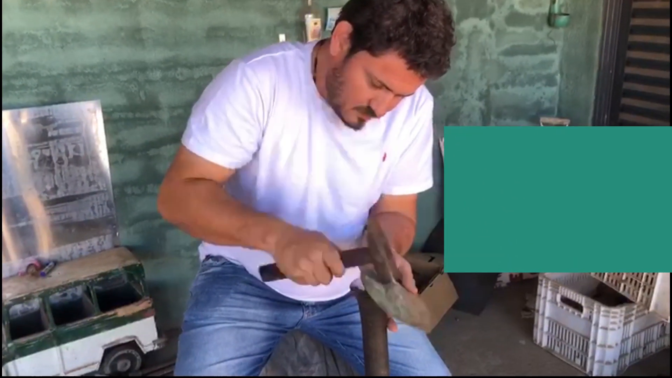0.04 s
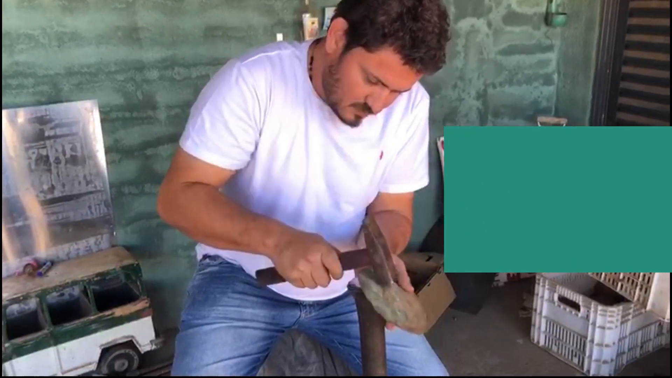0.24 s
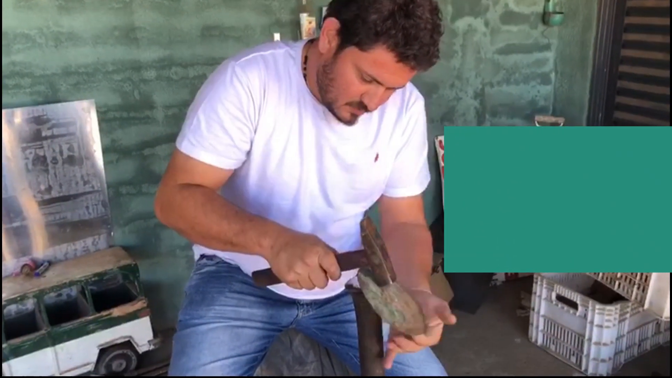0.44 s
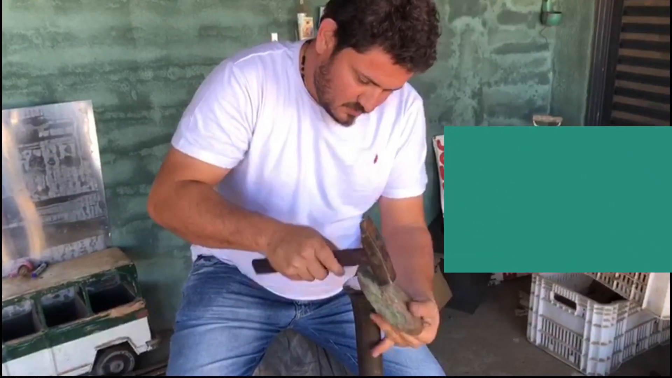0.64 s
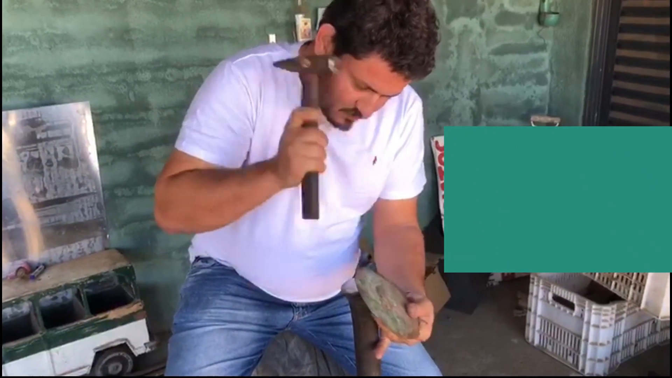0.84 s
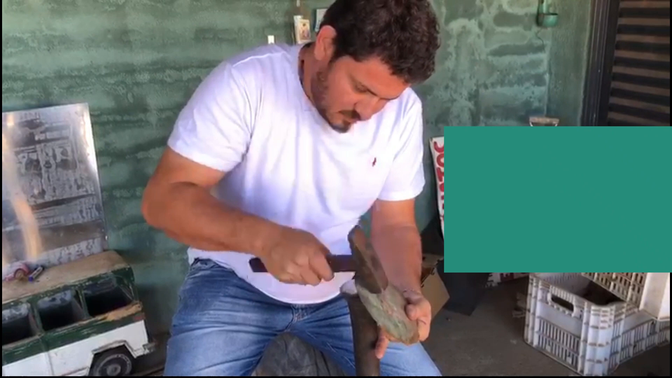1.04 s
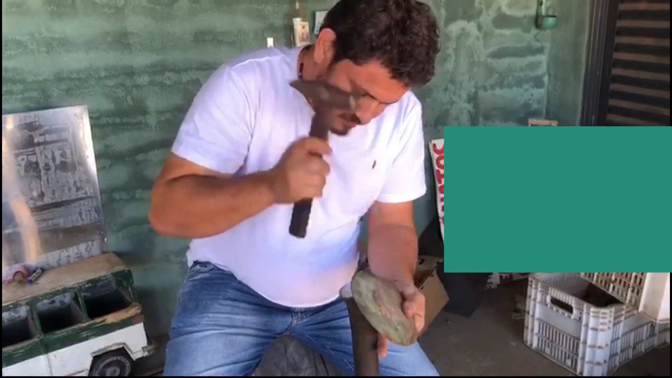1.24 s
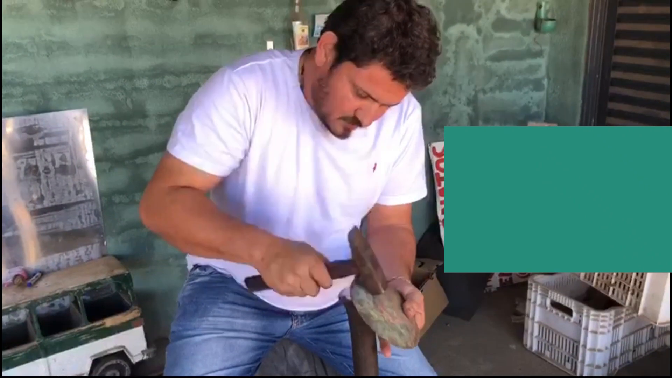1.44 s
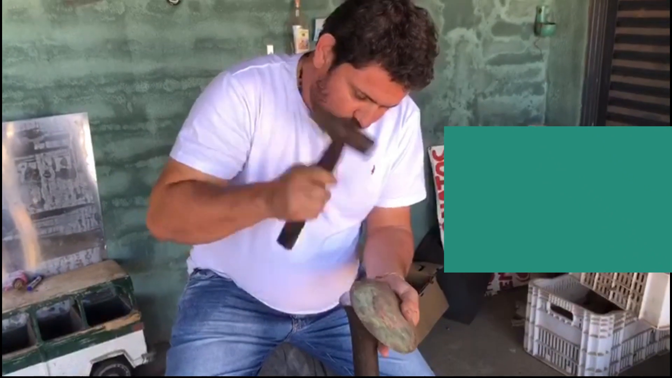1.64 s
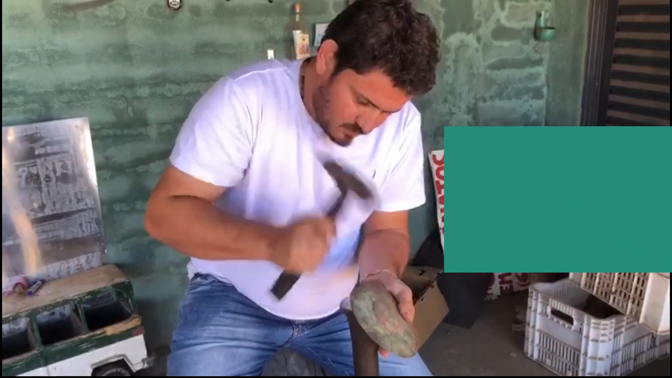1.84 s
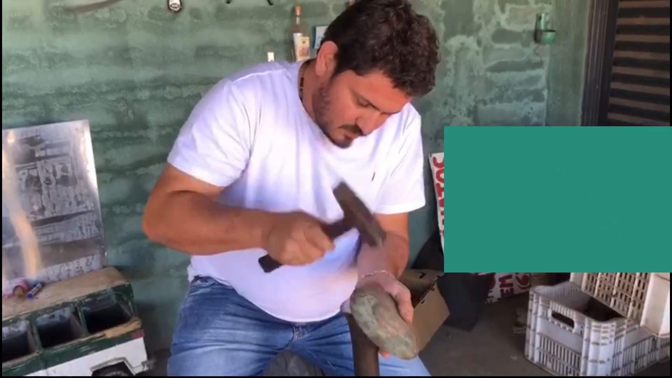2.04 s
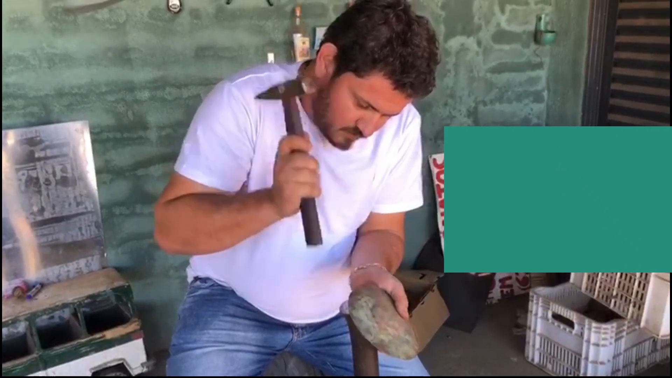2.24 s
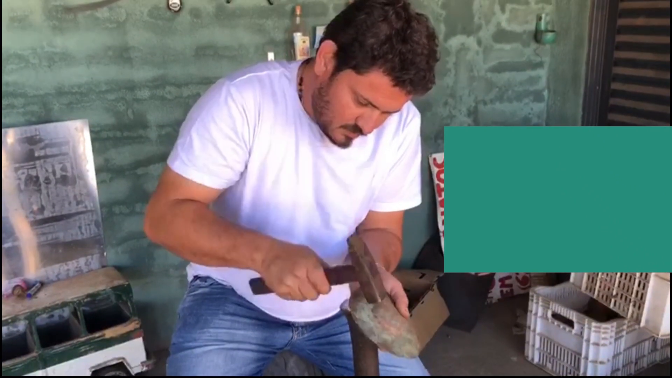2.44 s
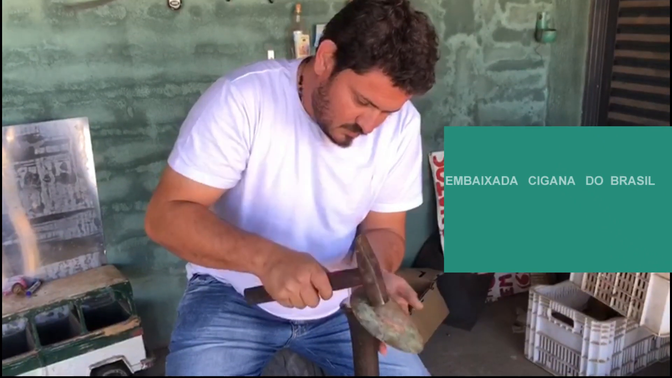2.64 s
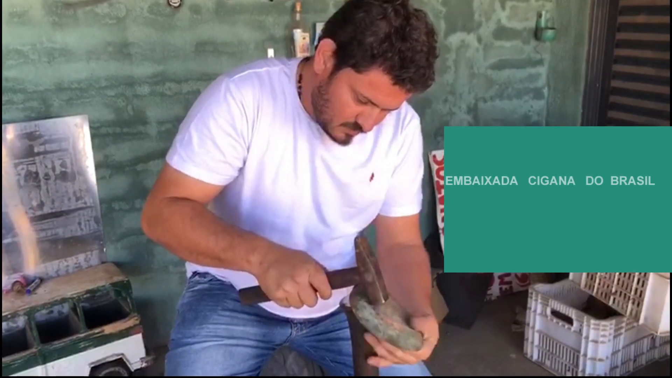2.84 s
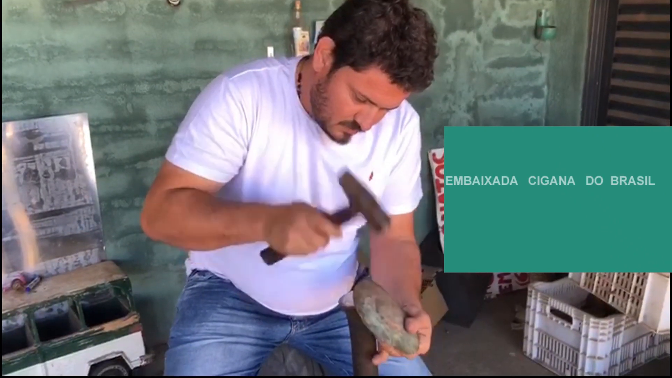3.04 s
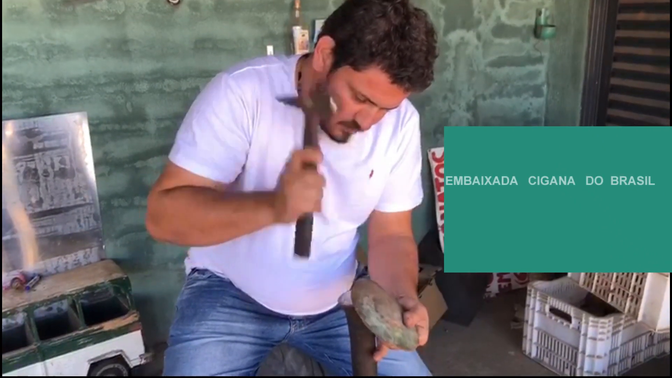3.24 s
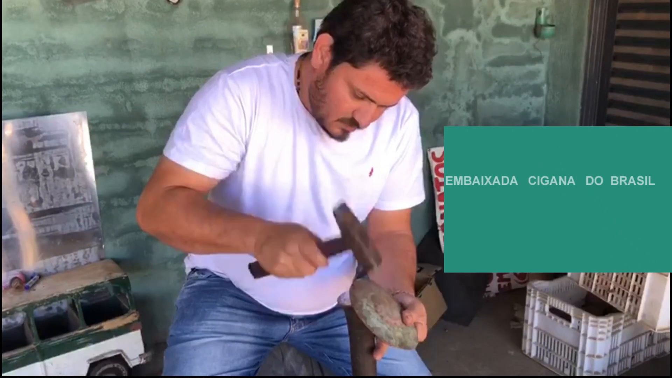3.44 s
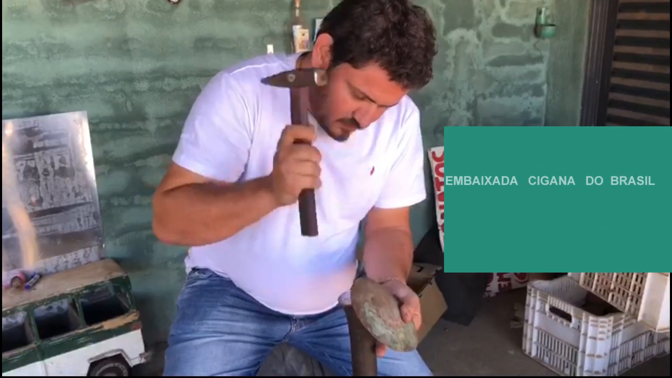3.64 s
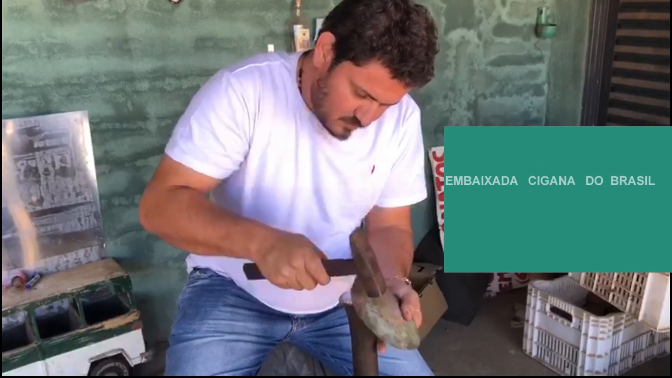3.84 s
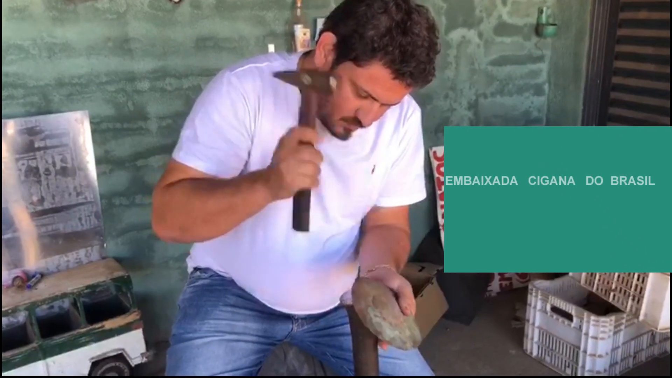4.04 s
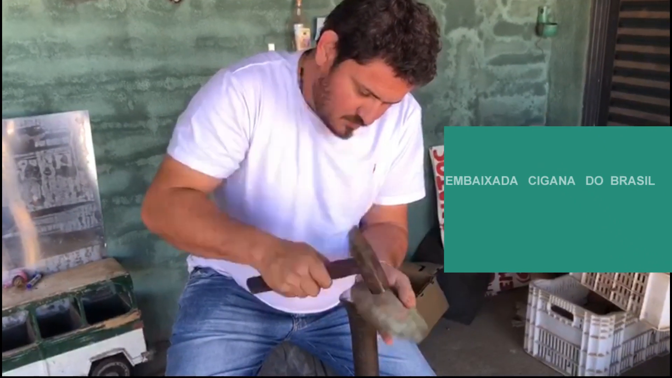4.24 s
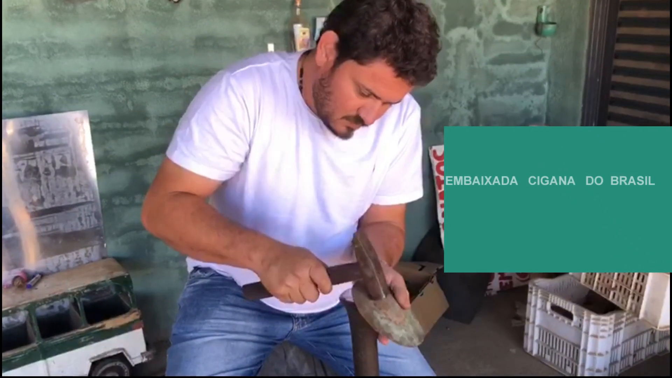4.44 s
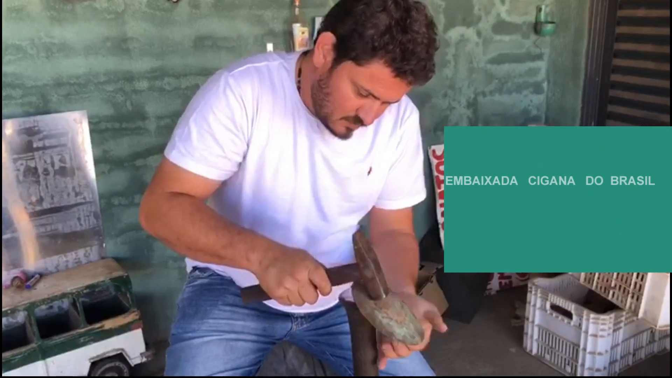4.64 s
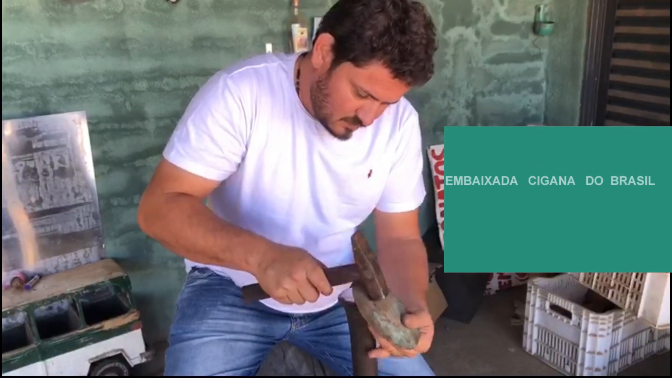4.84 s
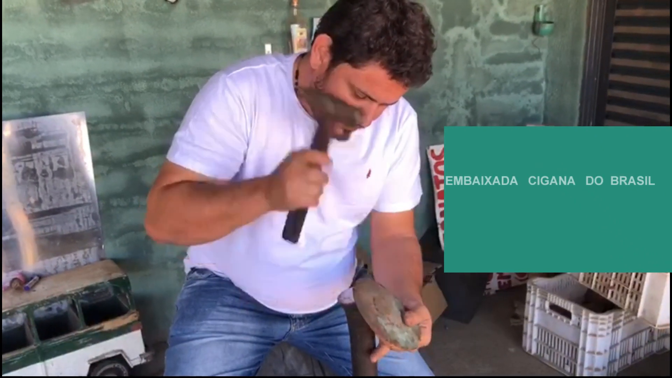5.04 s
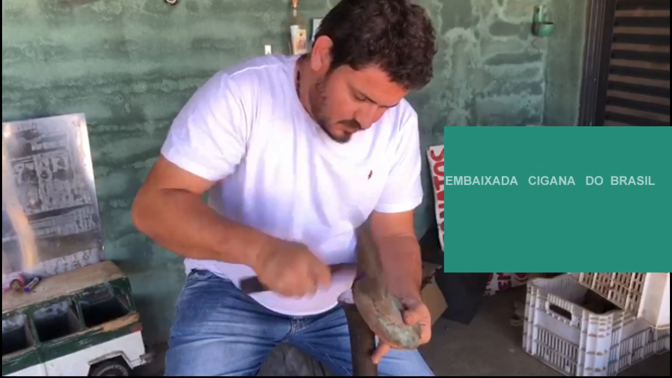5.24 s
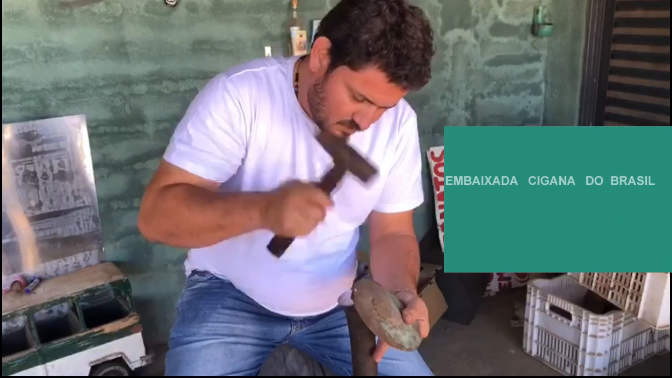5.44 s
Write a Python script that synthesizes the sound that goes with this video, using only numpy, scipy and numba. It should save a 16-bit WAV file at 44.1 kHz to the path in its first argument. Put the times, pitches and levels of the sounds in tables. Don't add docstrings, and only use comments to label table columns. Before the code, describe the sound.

The ring of an earlier blow is still fading as the stretch opens, then nine full hammer strokes on copper over steel follow, with pauses and a few tiny clicking rebounds. The blows sound piercing, short and slightly flattened by a phone microphone at two metres. The bare workshop answers with a brief bright echo, while quiet street rumble, rubbing metal and a faint bird-like whistle fill the gaps.

```python
import sys
import numpy as np
from scipy import signal
from scipy.fft import rfft, irfft
from scipy.io import wavfile
from scipy.ndimage import uniform_filter1d, minimum_filter1d
from numba import njit

SR = 44100
rng = np.random.default_rng(int(sys.argv[2]) if len(sys.argv) > 2 else 0)


def dump_mix(stems):
    frames = np.atleast_2d(stems).T
    limited = np.clip(frames, -1, 1)
    pcm = np.round(limited * 32767).astype(np.int16)
    wavfile.write(sys.argv[1], SR, pcm)


def gain_from_db(level_db):
    decades = np.asarray(level_db, float) / 20
    return 10 ** decades


N = 242550
LEAD = 3 * SR // 4

# start_s, peak_db, dish_pitch_hz, stake_ring_db, high_ring_db
BLOWS = [
    (0.17, -7, 2104, -0.5, -5.5),
    (1.128, -4.5, 2144, -2, -3.5),
    (1.557, -7, 1820, -0.5, -4),
    (2.007, -6.5, 1494, 0, -2),
    (2.481, -7, 1620, -2, -8),
    (3.454, -6, 1730, -0.5, -9.5),
    (3.898, -4.5, 1580, -4.5, -7),
    (4.36, -7, 1618, -3, -7),
    (5.38, -8, 1536, -2, -9),
]
TAPS = [
    (.355, -21, 1126, -27, -23.5),
    (2.6578, -23, 1540, -33, -33),
    (4.5605, -19, 1112, -8.5, -20.5),
]
EARLIER_BLOW = [
    (-.27, -9.5, 2000, 0.1, -5),
]

# pitch_hz, then for each tone level_db, t60_s (time to fall by 60 dB)
STAKE_HZ = [3216, 3241, 3238, 3290, 3335, 3745, 4990, 2645, 2990]
STAKE = [(-1, 0.15), (5, 0.11), (-23.5, 0.67), (-6, 0.14), (-6.5, 0.1), (-10, 0.22), (-10.5, 0.096),
         (-17.5, 0.17), (-21.5, 0.048)]
# pitch_hz, then for each tone level_db, t60_s
HIGH_HZ = [6370, 6408, 8527, 8556, 11050, 7870, 10730]
HIGH = [(-5, 0.2), (-5, 0.22), (2, 0.17), (-1, 0.2), (-11, 0.18), (-17, 0.1), (-18, .1)]
# pitch_hz, level_db, t60_s
THUMP = [(240.4, -16, 0.2), (176.6, -17.5, 0.15), (317.6, -15.5, 0.1), (112, -22.5, 0.12), (697, -17, 0.13)]
# ratio_to_its_pitch, level_db, t60_s
DISH = [(1, -3, 0.099), (1.441, -7.5, 0.074), (1.719, -6.5, .07), (2.42, -9, .1), (3.05, -8, .08),
        (4.4, -9.5, 0.052)]
# frequency_hz, level_db per Hz
CRACK = [(59, -62), (170, -23), (240, -13.5), (376, -22.5), (2450, -12.5), (3250, -11), (4070, -15),
         (8830, -16.5), (12200, -26.5), (13200, -50)]
# frequency_hz, t60_s
ROOM = [(125, 0.65), (350, 0.33), (1000, 0.34), (2500, 0.26), (5000, 0.28), (9000, 0.19)]
# frequency_hz, level_db per Hz
RUMBLE = [(15, -47.5), (25, -23), (41, -14), (70, -5), (165, -13.5), (269, -24), (407, -28), (979, -33.5),
          (1140, -33.5), (2420, -41.5), (3850, -46.5), (4500, -52), (12000, -64), (15600, -100.5),
          (22000, -120)]
# time_s, level_db
STREET = [
    (0.0, -49),
    (0.77, -47.5),
    (1.09, -46),
    (2.86, -49.5),
    (4.29, -44.5),
    (4.86, -49.5),
    (5.5, -43),
]
# start_s, length_s, centre_hz, width_hz, level_db
SCRAPES = [
    (3.07, .08, 5500, 4000, -65),
    (4.953, .012, 4500, 7000, -58),
    (4.96, .16, 6000, 8000, -68),
    (.42, .17, 8000, 6000, -60),
    (3.6, .1, 9000, 4000, -58),
    (.47, .18, 1200, 1300, -49),
    (2.78, .16, 1000, 500, -55),
    (1.0, .12, 700, 600, -59),
    (5.08, .19, 650, 800, -53),
]
# start_s, length_s, start_pitch_hz, end_pitch_hz, level_db
WHISTLES = [
    (.83, .09, 3200, 3050, -61),
    (.83, .08, 2400, 2400, -60),
    (5.13, .24, 3500, 2830, -61),
    (.59, .24, 400, 395, -60),
    (5.22, .14, 1050, 1050, -61),
    (4.6, .22, 1060, 1060, -52),
]
# start_s, level_db
CHATTER = [
    (.3525, -26),
    (.3580, -17),
    (2.6538, -25),
    (2.6620, -19),
    (4.5660, -18),
    (4.585, -24),
    (2.681, -25),
]

# thump_db, brightness_db, direct_crack_db, dish_db
FULL_BLOW, LIGHT_TAP = (3, 2, 0.5, -5.5), (-1.5, 3.35, 6, 12)
CRACK_DB, CRACK_S, CRASH_DB, DRIVE_DB = 1.5, 0.0044, 10, 4.5
THUMP_RISE_S, NEAR_RING_DB = 0.018, 8
ROOM_DB, ROOM_FILL_S = 12, 0.0025
SLAP_S, SLAP_WIDE_S, SLAP_DB = 0.045, 0.012, 9
RING_SLAP_DB = 7
LATE_DB, LATE_STRETCH, LATE_TOP_HZ = -13, 2.6, 4500
RING_ECHO_DB = -5
DISH_ECHO_DB = -7
RUMBLE_DB = -44.5
GLIDE_SHARE = 0.75
LIMIT_DB, LIMIT_RATIO, RELEASE_S = -9.5, 3.03, 0.004
TOP_HZ = 12100
MASK_HZ, MASK_DB, MASK_TILT_DB = 7000, -41, 14
SMEAR_S, SMEAR_DB = 0.022, -31


def level(x, db):
    return x * gain_from_db(db) / np.sqrt(np.mean(x ** 2))


def colour(x, points):
    hz, db = np.transpose(points)
    f = np.maximum(np.arange(len(x) // 2 + 1) * SR / len(x), 1)
    curve = np.interp(np.log(f), np.log(hz), db)
    return irfft(rfft(x) * gain_from_db(curve), len(x))


def band(x, hz, width):
    low = max(hz - width / 2, 30)
    return signal.sosfilt(signal.butter(2, [low, low + width], "band", fs=SR, output="sos"), x)


def fade(t):
    return np.cos(np.pi / 2 * t / t[-1])


def street():
    noise = level(colour(rng.standard_normal(N), RUMBLE), RUMBLE_DB)
    s, db = np.transpose(STREET)
    swell = gain_from_db(np.interp(np.arange(N) / SR, s, db - db.mean()))
    bass = signal.sosfilt(signal.butter(2, 200, fs=SR, output="sos"), noise)
    return noise + bass * (swell - 1)


def whistles():
    out = np.zeros(N)
    for s, length, start_hz, end_hz, db in WHISTLES:
        n = int(length * SR)
        waver = level(band(rng.standard_normal(SR // 2), 150, 130)[:n], 0)
        pitch = end_hz + (start_hz - end_hz) * np.exp(-np.arange(n) / (GLIDE_SHARE * n))
        tone = np.sin(2 * np.pi * np.cumsum(pitch) / SR)
        out[int(s * SR):][:n] += gain_from_db(db) * tone * (1 + waver) * np.hanning(n) ** 0.5
    return out


def scrapes():
    out = np.zeros(N)
    for s, length, hz, width, db in SCRAPES:
        n = int(length * SR)
        grit = rng.standard_normal(n) * gain_from_db(3.3 * rng.exponential(size=n))
        out[int(s * SR):][:n] += level(band(grit, hz, width), db) * np.hanning(n) ** 0.5
    return out


def chatter():
    out, t = np.zeros(N), np.arange(SR // 50) / SR
    for s, db in CHATTER:
        noise = level(band(rng.standard_normal(len(t)), 6300, 11000), db)
        out[int(s * SR):][:len(t)] += noise * np.exp(-t / 0.0028)
    return out


def room(t, slap_db):
    hz, s, frames = signal.stft(rng.standard_normal(len(t)), SR, nperseg=512)
    room_hz, room_t60 = np.transpose(ROOM)
    t60 = np.interp(np.log(hz + 1), np.log(room_hz), room_t60)
    fall = np.log(1000) * s / t60[:, None]
    dull = 1 / (1 + (hz[:, None] / LATE_TOP_HZ) ** 4)
    decay = np.exp(-fall) + gain_from_db(LATE_DB) * np.exp(-fall / LATE_STRETCH) * dull
    tail = signal.istft(frames * decay, SR, nperseg=512)[1][:len(t)]
    fill = 1 - np.exp(-t / ROOM_FILL_S)
    slap = gain_from_db(slap_db * np.exp(-((t - SLAP_S) / SLAP_WIDE_S) ** 2))
    tail = tail * fade(t) * fill * slap
    return gain_from_db(ROOM_DB) * tail / np.sqrt(np.sum(tail ** 2))


def ring(modes, t, flutter=0.8):
    hz, db, t60 = np.transpose(modes)[:, :, None]
    scatter_db = 2 * rng.standard_normal((len(modes), 1))
    detune = 1 + 0.0006 * rng.standard_normal((len(modes), 1))
    steps = np.repeat(rng.standard_normal((len(modes), len(t) // 600 + 1)), 600, axis=1)[:, :len(t)]
    shake = 1 + flutter * uniform_filter1d(steps, size=600, axis=1)
    decay = np.exp(-np.log(1000) * t / t60) * fade(t) * shake
    return (gain_from_db(db + scatter_db) * decay * np.sin(2 * np.pi * hz * detune * t)).sum(axis=0)


def hammer():
    out, t = np.zeros(N + 3 * LEAD), np.arange(LEAD) / SR
    echoes = room(t, RING_SLAP_DB)
    for s, peak_db, tone_hz, ring_db, high_db in list(EARLIER_BLOW) + list(BLOWS) + list(TAPS):
        full = peak_db > -15
        thump_db, bright_db, direct_db, dish_db = FULL_BLOW if full else LIGHT_TAP
        tilt = [(350, thump_db), (1100, -bright_db), (8000, bright_db)]

        white = rng.standard_normal(LEAD)
        cracking = colour(white, CRACK)
        boost = np.std(white) / np.std(cracking)
        crack = band(colour(cracking, tilt), 7700, 12800) * np.exp(-t / CRACK_S)
        crack *= gain_from_db(CRACK_DB + direct_db) * boost
        crack_echoes = room(t, SLAP_DB if full else 0)
        crash = gain_from_db(CRASH_DB) * boost * colour(colour(crack_echoes, CRACK), tilt) * fade(t)

        dish = gain_from_db(dish_db) * ring([(tone_hz * ratio, db, t60) for ratio, db, t60 in DISH], t)
        stake = gain_from_db(ring_db) * ring(np.column_stack([STAKE_HZ, STAKE]), t)
        stake += gain_from_db(high_db) * ring(np.column_stack([HIGH_HZ, HIGH]), t)
        thump = gain_from_db(thump_db) * ring(THUMP, t, flutter=0) * (1 - np.exp(-t / THUMP_RISE_S))

        near = gain_from_db(NEAR_RING_DB - 13) * (dish + stake + thump)
        to_walls = gain_from_db(-16) * (gain_from_db(DISH_ECHO_DB) * dish + stake + thump)
        echoed = gain_from_db(RING_ECHO_DB) * signal.fftconvolve(to_walls, echoes)
        start, drive = int(s * SR) + LEAD, gain_from_db(peak_db + DRIVE_DB)
        out[start:start + LEAD] += drive * (near + crack + crash)
        out[start:start + 2 * LEAD - 1] += drive * echoed
    return out[LEAD:LEAD + N]


def scene():
    return (street() + whistles() + scrapes() + chatter() + hammer())[None]


@njit
def follow(x, release):
    y, e = np.empty(len(x)), 1e-6
    for i in range(len(x)):
        e = max(abs(x[i]), e * release)
        y[i] = e
    return y


def limiter(x):
    peak = follow(x, np.exp(-1 / (RELEASE_S * SR)))
    gain = np.minimum(gain_from_db(LIMIT_DB) / peak, 1) ** (1 - 1 / LIMIT_RATIO)
    return x * uniform_filter1d(minimum_filter1d(gain, size=9), size=9)


def drop_faint_treble(x):
    hz, _, frames = signal.stft(x, SR, nperseg=1024)
    size = np.abs(frames)
    loudest = uniform_filter1d(size[hz > 1500].max(axis=0), size=3)
    mask_db = MASK_DB + MASK_TILT_DB * np.log2(np.maximum(hz, 1) / MASK_HZ)
    faint = uniform_filter1d(size, size=3, axis=0) < loudest * gain_from_db(mask_db)[:, None]
    lost = faint & (hz > MASK_HZ)[:, None]
    return x - signal.istft(frames * lost, SR, nperseg=1024)[1][:N]


def smear_ahead(x):
    n = int(SMEAR_S * SR)
    for row in BLOWS:
        start = int(row[0] * SR)
        turns = np.exp(2j * np.pi * rng.random(n // 2 + 1))
        hiss = irfft(rfft(x[start:start + n]) * turns, n)
        x[start - n:start] += gain_from_db(SMEAR_DB) * band(hiss, 4700, 16000)
    return x


def band_limit(x):
    return signal.sosfilt(signal.butter(12, 13210, fs=SR, output="sos"), x)


def record(dry):
    x = limiter(dry[0])
    x = signal.sosfilt(signal.butter(3, 50, "high", fs=SR, output="sos"), x)
    x = signal.sosfilt(signal.ellip(6, 0.5, 45, TOP_HZ, fs=SR, output="sos"), x)
    x = smear_ahead(drop_faint_treble(x))
    return band_limit(x[None])


dry = scene()
out = record(dry)
dump_mix(out)
```